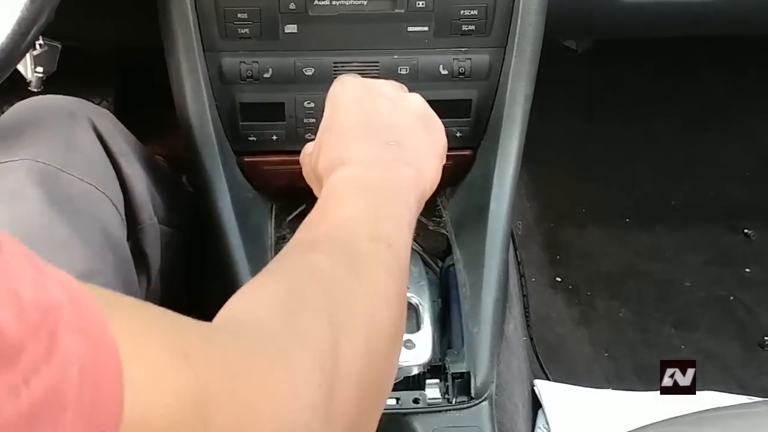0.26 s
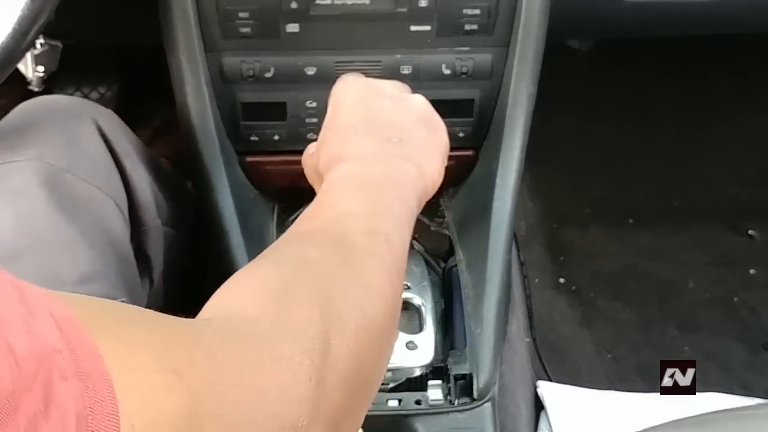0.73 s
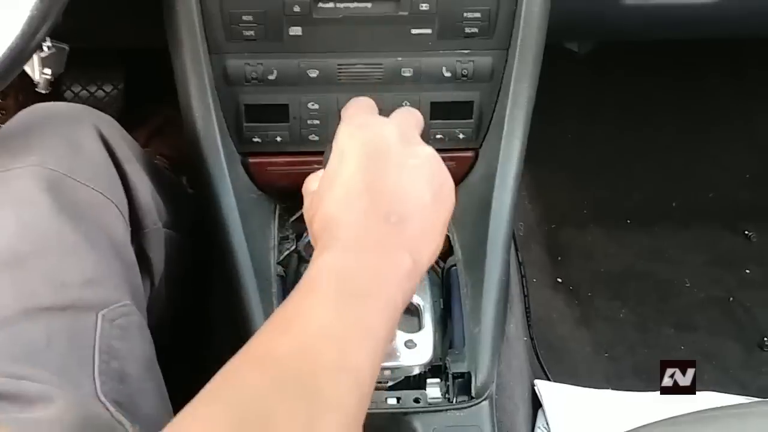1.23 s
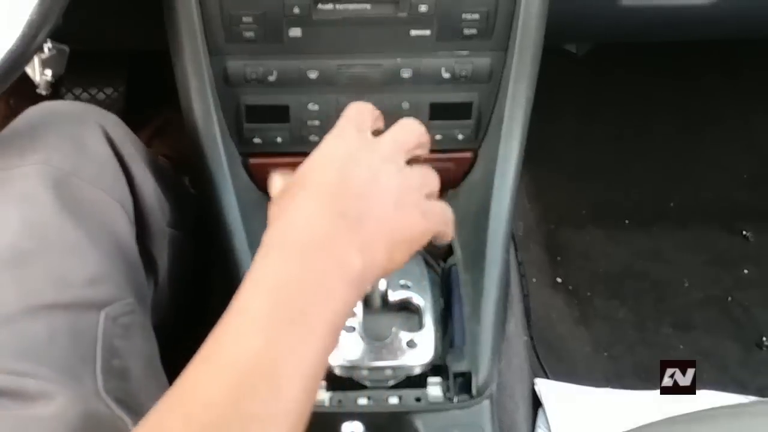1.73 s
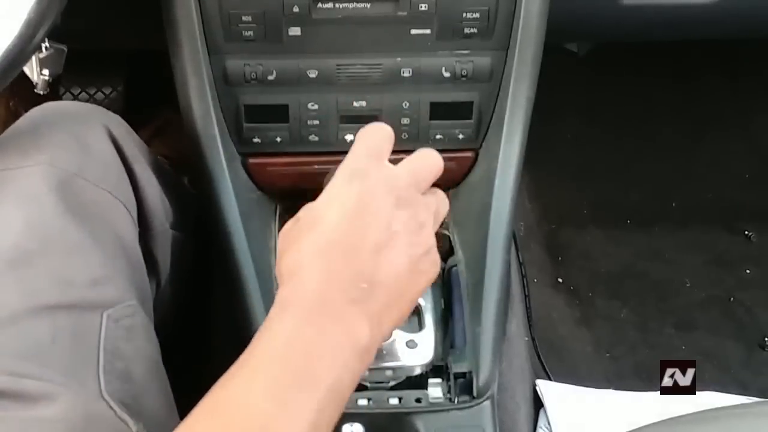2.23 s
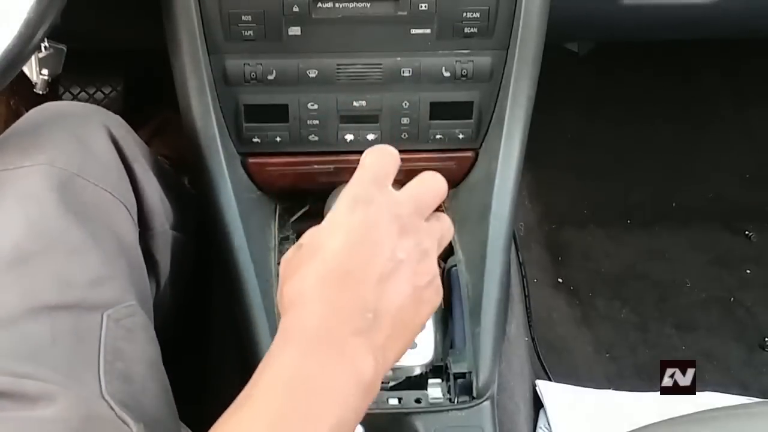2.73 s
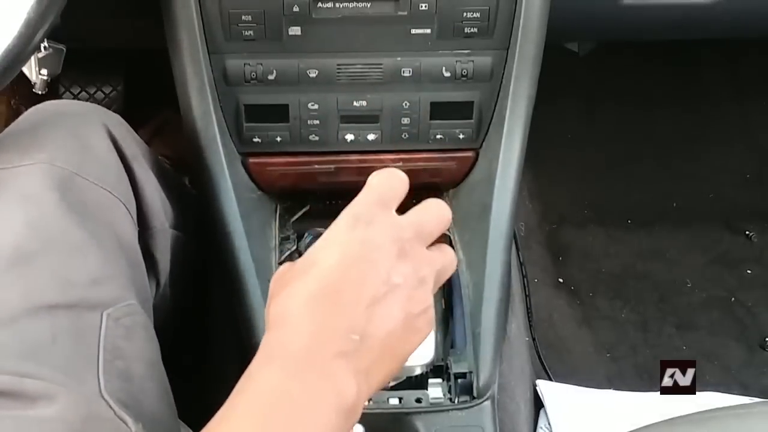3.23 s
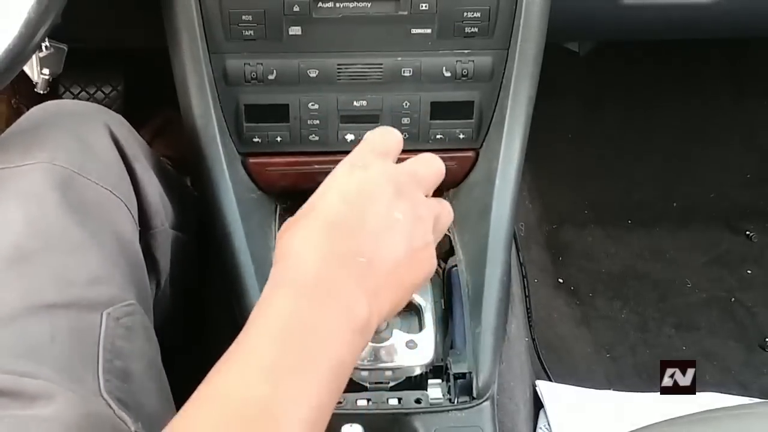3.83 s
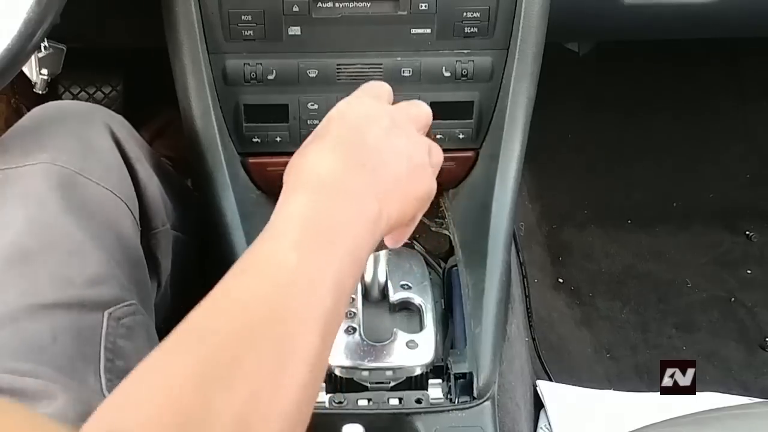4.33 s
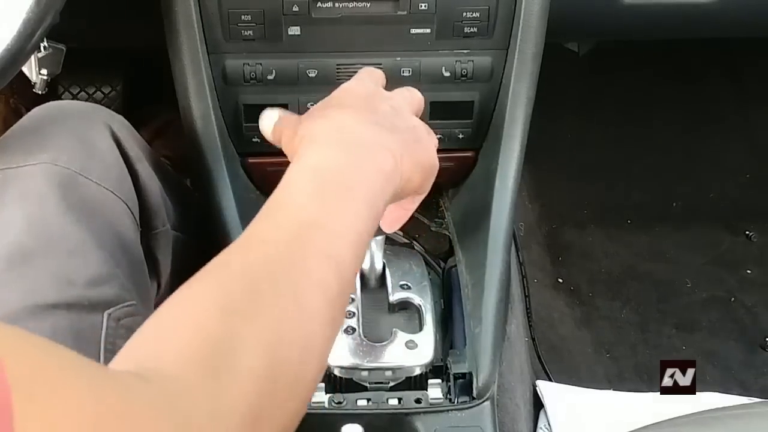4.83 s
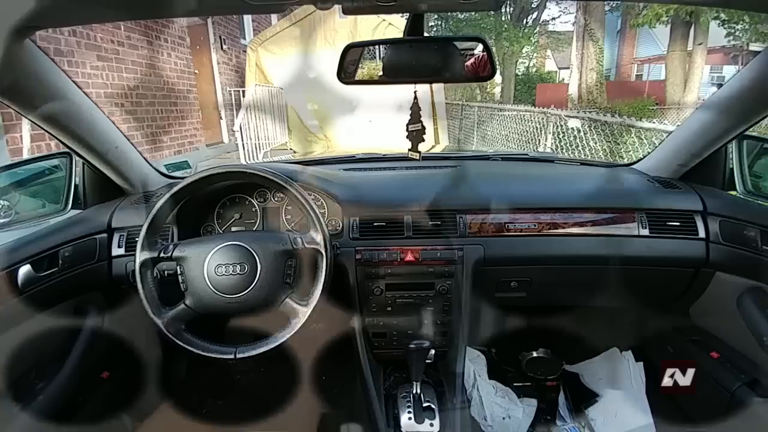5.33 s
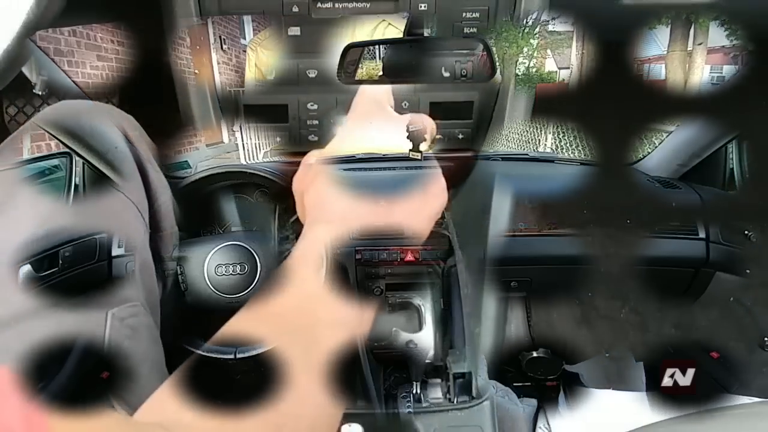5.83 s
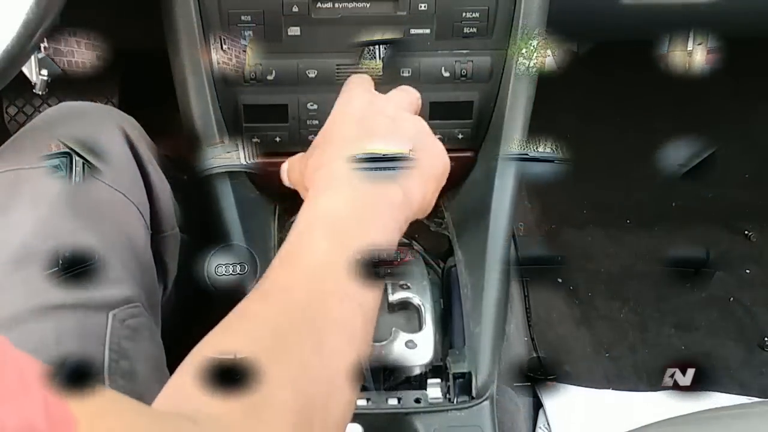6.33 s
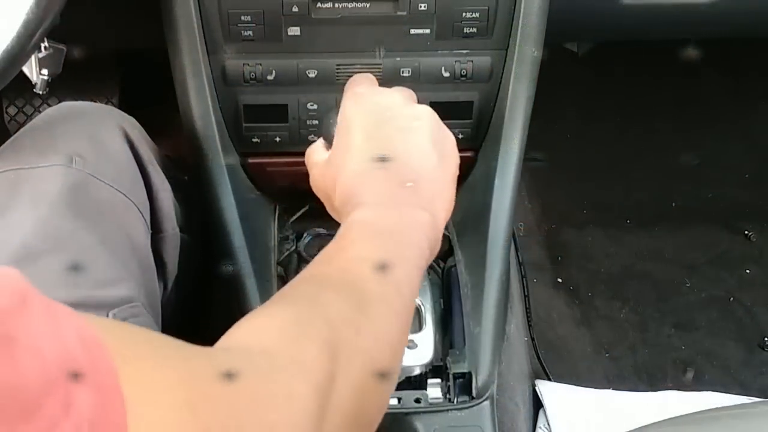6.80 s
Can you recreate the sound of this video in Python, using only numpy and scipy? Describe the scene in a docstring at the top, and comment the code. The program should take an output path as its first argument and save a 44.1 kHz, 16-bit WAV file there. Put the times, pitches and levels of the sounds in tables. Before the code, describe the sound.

Close clicks and padded clunks of a gear selector pulled back notch by notch and pushed forward, then a fading low hum with plastic ticks.

```python
"""Gear lever in a small car cabin

An automatic gear lever is pulled back through its gate and pushed forward again, heard close up.
Detents, plastic ticks and padded knocks are shaped noise bursts; the floor and catch are damped sines.
A palm rubs in shaped noise and a falling whistle squeaks once, over a low rumble and a faint hiss.
Near the end a throbbing hum, like that of a distant motor, is built from three sines and a soft roar.
"""
import sys
import numpy as np
from scipy import signal
from scipy.fft import rfft, irfft, next_fast_len
from scipy.io import wavfile
from scipy.ndimage import uniform_filter1d

SR = 44100
rng = np.random.default_rng(int(sys.argv[2]) if len(sys.argv) > 2 else 0)


def unload_wav(signal):
    """Save mono or channel-first audio to the path in sys.argv[1] as 16-bit WAV at rate SR, clipped to [-1, 1]."""
    wavfile.write(
        sys.argv[1],
        SR,
        np.round(np.clip(np.atleast_2d(signal).T, -1, 1) * 32767).astype(np.int16),
    )


N = 311346
TIME = np.arange(N) / SR  # the whole scene, s
T = np.arange(SR // 2) / SR  # one ringing sound, s
HZ = np.fft.rfftfreq(8192, 1 / SR)  # frequency grid of the impact filters


def amp(db):
    """Turns dB into a linear gain."""
    return 10 ** (np.asarray(db) / 20)


def unit(x):
    """Scales to rms 1."""
    return x / np.sqrt(np.mean(x ** 2) + 1e-20)


def read(points, hz):
    """Joins (f, value) points on a log-frequency axis."""
    f, value = np.transpose(points)
    return np.interp(np.log(hz + 1), np.log(f + 1), value)


def curves(rows):
    """Joins (t, value) points by straight lines."""
    return np.interp(TIME, *np.transpose(rows))


def swell(s, half_length):
    """A bell-shaped gain that peaks at time s."""
    return np.exp(-((TIME - s) / half_length) ** 2)


def wander(rate):
    """A random curve of rms 1 through `rate` new points per second."""
    points = rng.standard_normal(16384)
    return unit(np.interp(TIME * rate, np.arange(16384), points))


def noise(colour):
    """Two unrelated steady noises of one colour, scaled together to rms 1."""
    size = next_fast_len(N)
    gain = amp(read(colour, np.fft.rfftfreq(size, 1 / SR)))
    spectrum = rfft(rng.standard_normal((2, size))) * gain
    return unit(irfft(spectrum, size)[:, :N])


def add(mix, s, sound):
    """Lays a sound into the mix at time s."""
    part = mix[:, max(round(s * SR), 0):][:, :sound.shape[1]]
    part += sound[:, :part.shape[1]]


def blow(sound, db):
    """Gives each channel the energy of a hundredth of a second at this level."""
    energy = (sound ** 2).sum(1, keepdims=True)
    return amp(db) * sound / np.sqrt(energy * 100 / SR + 1e-20)


def peaks(modes, pitch=1):
    """Gain of a set of resonances, their powers summed."""
    power = 0
    for f, width, db in modes:
        off_tune = (HZ ** 2 - (f * pitch) ** 2) / (width * HZ + 1)
        power = power + amp(db) ** 2 / (1 + off_tune ** 2)
    return np.sqrt(power)


def impact(gain, rise, t60, direct=0, spiky=0.29):
    """A contact and its crowd of reflections off the near cabin walls, through a causal filter."""
    rise, t = max(rise, 1e-4), T[:2 * (len(HZ) - 1)]
    signs = rng.choice([-1., 1.], (2, len(t)))
    arrivals = signs * np.exp(spiky * rng.standard_normal((2, len(t))))
    arrivals *= np.minimum(t / rise, 1) * amp(-60 * np.maximum(t - rise, 0) / t60)
    arrivals[:, int(rise * SR)] += direct * np.linalg.norm(arrivals[0])
    # flatten the broad colour of the arrivals, so that the struck part sets the timbre
    smooth_power = uniform_filter1d(abs(rfft(arrivals)) ** 2, size=55, axis=1)
    gain = gain / np.sqrt(smooth_power)
    # minimum phase: the filter speaks at once, with no ringing before the contact
    log_gain = np.log(np.maximum(gain / gain.max(), 1e-5))
    circle = np.hstack([log_gain, log_gain[:, -2:0:-1]])
    minimum_phase = np.exp(np.conj(signal.hilbert(circle)))
    taps = np.fft.ifft(minimum_phase).real[:, :len(HZ) // 2]
    return signal.fftconvolve(arrivals, taps, axes=1)


def ringing(modes, rise, db, detune=0.036):
    """Damped modes that swell over the rise time, each slightly detuned by chance."""
    ring = 0
    for hz, level, t60 in modes:
        mode_hz = hz * (1 + detune * rng.uniform(-1.21, 1))
        phase = 2 * np.pi * (mode_hz * T + rng.random((2, 1)))
        ring = ring + amp(level - 60 * T / t60) * np.sin(phase)
    return blow(ring * (1 - np.exp(-(T / rise) ** 2)), db)


# colour of the low cabin rumble: (f/Hz, relative level/dB)
RUMBLE_COLOUR = [(20, -36), (30, -20), (42, 3), (58, 4.5), (80, -7), (107, -11.5), (200, -15.5), (297, -22),
                 (400, -26.5), (700, -29.5), (1200, -41), (2500, -40), (5000, -99)]
# colour of the faint hiss: (f/Hz, relative level/dB)
HISS_COLOUR = [(300, 12), (1000, 7.5), (2000, -0.5), (3500, 2.5), (5300, 1.5), (7000, 0.5), (8800, 6.5),
               (9600, -1), (10400, -10), (13000, -3), (15500, -5.5)]
# the lever and arm stir the console between blows: (t/s, rumble level/dB before the lift below)
STIR_LEVELS = [(0.0, -50.5), (0.37, -53.5), (1.02, -46), (2.04, -54), (2.37, -50), (2.55, -55),
               (4.95, -54.5), (5.28, -50), (7.05, -50)]


def ambience(hiss_db=-69.0, rumble_lift_db=2.5):
    """Low coloured noise that follows the stirring of the console, and a faint, even hiss."""
    rumble = noise(RUMBLE_COLOUR) * amp(curves(STIR_LEVELS) + rumble_lift_db)
    return rumble + noise(HISS_COLOUR) * amp(hiss_db)


GRIP_DB = -69  # the palm resting on the knob
# colour of skin on the knob: (f/Hz, relative level/dB)
RUB_COLOUR = [(300, 8), (900, -1.5), (1400, 3), (1900, 1), (2600, -3.5), (4000, -6.5), (6500, -12.5),
              (9000, -9), (11000, -19.5)]
# the palm slides in short strokes: (peak t/s, half length/s, level/dB)
PALM_STROKES = [(1.198, 0.065, -57), (1.464, .01, -58), (1.599, 0.07, -59.5), (5.12, 0.031, -55),
                (5.181, 0.013, -56.5), (5.906, 0.016, -54.5), (6.785, 0.039, -58)]


def palm(grain_db=1.5):
    """Skin drags unevenly on the knob: noise with a jittering level."""
    level = amp(GRIP_DB) + sum(amp(db) * swell(s, half) for s, half, db in PALM_STROKES)
    return noise(RUB_COLOUR) * level * amp(grain_db * wander(rate=61))


# colour of dry plastic: (f/Hz, relative level/dB)
PLASTIC_COLOUR = [(250, -22), (800, 0), (1300, 1), (2200, -2.5), (3400, -3.5), (5000, -6.5), (7000, -8),
                  (9000, -1), (9700, -9.5), (10600, -24.5), (12500, -14.5), (15500, -23)]
# resonances that all plastic parts share with the gate plate: (f/Hz, width/Hz, relative level/dB)
PLATE_MODES = [(2760, 44, -3.5), (3030, 57, -14), (3324, 47, -2), (3970, 110, -7)]


def plastic(db, rise, tilt_db, hz, resonance_db=7, width=0.14, plate_db=7, t60=0.083):
    """A dry tick that rings one plastic part, at two pitches, and the gate plate."""
    tilt = tilt_db * np.log2(np.maximum(HZ, 700))  # dB per octave above 700 Hz
    part = [(hz, hz * width, resonance_db), (hz * 1.333, hz * width, resonance_db - 8.5)]
    colour = amp(read(PLASTIC_COLOUR, HZ) + tilt)
    colour *= np.hypot(1, peaks(part))
    colour *= np.hypot(1, amp(plate_db) * peaks(PLATE_MODES))
    return blow(impact(colour, rise, t60, direct=0.15, spiky=0.96), db)


# resonances of the console: (f/Hz, width/Hz, relative level/dB)
CONSOLE_MODES = [(167, 66, 5.5), (242.5, 95, 4.5), (319, 59, 1), (459.5, 40, 0), (515, 25, -0.5),
                 (628, 39, -1), (787, 74, 2.5), (958, 130, -2), (1130, 86, -21), (1360, 200, -65)]


def console(db, contact_hz, rise, t60, damping=0.8, direct=0.23):
    """The console rings up to the pitch of the contact; a softer contact leaves the upper modes still."""
    r = HZ / contact_hz
    contact = 1 / np.hypot(1 - r ** 2, damping * r) / np.hypot(1, (0.21 / (r + 1e-6)) ** 2)
    padding = 1 / np.hypot(1, (HZ / 1350) ** 6)  # dulls the treble
    return blow(impact(peaks(CONSOLE_MODES) * contact * padding, rise, t60, direct), db)


def knock(db, contact_hz):
    """A padded blow on the console; the higher the contact pitch, the drier the knock."""
    t60 = 0.098 * (500 / contact_hz) ** .32
    return console(db, contact_hz, rise=0.00195, t60=t60, damping=1.0)


# low modes of the floor pan and cabin air: (f/Hz before detuning, relative level/dB, t60/s)
FLOOR_MODES = [(48.7, -13.5, 0.35), (66.6, -3.5, 0.17), (88.5, -4, 0.15), (124.2, -6.5, 0.1),
               (153, -0.5, 0.11), (191.3, -1, 0.087)]


def thump(db, rise=0.01):
    """The floor pan takes up the push and booms in its low modes."""
    return ringing(FLOOR_MODES, rise, db)


# the lock button and knob tick:
# (t/s, level/dB, rise/s, brightness/dB per octave, part resonance f/Hz, console level/dB)
PLASTIC_TICKS = [(.05, -44.5, .016, 1, 990, -47.5), (.096, -45, 0.0046, 0.5, 1010, -44),
                 (0.151, -38, 0.012, -0.5, 8240, -36), (.582, -46.5, 0.0024, 2, 8400, -45.5),
                 (.706, -51, 0.0022, -0.5, 3250, -52.5), (0.87, -47, 0.0037, 6.5, 10300, -56),
                 (.905, -42, 0.00089, -2.1, 1900, -46), (1.533, -47.5, 0.011, 2.5, 1170, -43),
                 (1.555, -50, 0.0037, -1.5, 9100, -47), (1.96, -51, 0.013, 13, 6200, -55),
                 (4.796, -34.5, 0.011, 3, 5900, -45.5), (5.097, -53, 0.0024, 0.5, 8500, -60),
                 (5.447, -51.5, 0.0027, 0, 8200, -71), (5.613, -41, 0.0051, 0, 3130, -51),
                 (5.693, -48, 0.0098, -1.5, 1370, -45.5), (5.7703, -30, 0.0023, 1, 8550, -37),
                 (6.053, -32, 0.0066, 2.5, 5600, -48), (6.066, -32.5, 0.0011, -2.7, 3420, -37),
                 (6.713, -45.5, 0.013, .5, 810, -48), (6.842, -46.5, 0.0033, 6.5, 5260, -49.5)]


def ticks(lead_db=-17, lead_s=.008, lag_s=0.00392, thump_db=3):
    """A faint lead-in noise comes just before each tick, which also shakes the console and floor."""
    out = np.zeros((2, N))
    for s, db, rise, tilt_db, hz, console_db in PLASTIC_TICKS:
        add(out, s - lead_s, plastic(db + lead_db, 0.0054, tilt_db, hz, t60=0.055))
        add(out, s, plastic(db, rise, tilt_db, hz))
        add(out, s + lag_s, knock(console_db, contact_hz=870))
        add(out, s + lag_s, thump(console_db + thump_db))
    return out


# dull knocks of the hand on the lever and of the lever on its stops:
# (t/s, console level/dB, contact f/Hz, thump level/dB)
DULL_KNOCKS = [(.175, -32, 424, -31), (0.344, -51.5, 400, -48.5), (.577, -30.5, 268, -31.5),
               (.596, -31, 165, -35.5), (.67, -41, 342, -50), (.693, -36, 307, -42),
               (0.791, -43.5, 280, -37), (.83, -39, 322, -37.5), (1.142, -29.5, 400, -35),
               (1.18, -36, 566, -30), (1.567, -58, 200, -35.5), (1.705, -37, 378, -44.5),
               (2.598, -52.5, 500, -51), (2.975, -53, 764, -53), (3.226, -47, 200, -30.5),
               (3.249, -34, 350, -32), (4.439, -41, 520, -39.5), (4.821, -44.5, 910, -38.5),
               (5.075, -32.5, 514, -38.5), (5.111, -36.5, 315, -48), (5.13, -39.5, 346, -31.5),
               (5.215, -39.5, 169, -30.5), (5.235, -31.5, 200, -31), (5.333, -32, 1100, -31.5)]


def knocks():
    """Padded blows reach only the console and the floor."""
    out = np.zeros((2, N))
    for s, console_db, contact_hz, thump_db in DULL_KNOCKS:
        add(out, s, knock(console_db, contact_hz))
        add(out, s, thump(thump_db, rise=0.018))
    return out


# the grip shifts now and then and nudges the lever; the spread goes either way
NUDGES_PER_S, NUDGE_DB, NUDGE_SPREAD_DB, NUDGE_HZ = 1.2, -54.5, 1, 480


def nudges(count=40):
    """Faint padded knocks at chance moments."""
    out, s = np.zeros((2, N)), 0
    for wait, size in rng.random((count, 2)):
        s = s + 2 * wait / NUDGES_PER_S
        if s < N / SR:
            db = NUDGE_DB + NUDGE_SPREAD_DB * (2 * size - 1)
            add(out, s, knock(db, NUDGE_HZ))
    return out


CATCH_S = 1.1318  # the lever clears the parking catch
CATCH_RING_DB, CATCH_SNAP_DB, CATCH_CONSOLE_DB, CATCH_THUMP_DB = -23.5, -34, -33, -29
# the base of the lever rings: (f/Hz before slight detuning, relative level/dB, t60/s)
LEVER_BASE_MODES = [(327, -13, 0.095), (597, -12.5, 0.057), (738, -2, 0.063), (1375, -20, 0.087),
                    (3560, -10, .02)]


def catch():
    """A snap and a hollow clunk of damped modes as the lever leaves the parking position."""
    out = np.zeros((2, N))
    snap = plastic(CATCH_SNAP_DB, rise=.0035, tilt_db=-2.0, hz=4040, resonance_db=8, t60=0.17)
    add(out, CATCH_S, ringing(LEVER_BASE_MODES, rise=0.0011, db=CATCH_RING_DB, detune=.005))
    add(out, CATCH_S, snap)
    add(out, CATCH_S, knock(CATCH_CONSOLE_DB, contact_hz=740))
    add(out, CATCH_S, thump(CATCH_THUMP_DB))
    return out


# resonances of the detent spring: (f/Hz before the pitch factor, width/Hz, relative level/dB)
SPRING_MODES = [(1666, 35, 5.5), (2430, 100, 4), (2950, 120, -16), (3370, 130, -13), (3160, 100, 14.5),
                (3770, 130, 10), (3680, 114, 17), (4130, 160, 13.5), (4100, 130, -2), (6200, 160, -28),
                (7520, 150, 8), (8560, 120, -15), (9100, 130, 8), (8600, 170, 2), (10000, 120, -31)]
# colour of the crack: (f/Hz, relative level/dB)
CRACK_COLOUR = [(300, 4.5), (800, -2.5), (1300, -2), (1900, -5), (3400, -3), (5000, -5.5), (6600, -5),
                (8700, 1.5), (9500, -8.5), (10500, -19), (12500, -18), (15500, -49)]
# the lever drops into a notch: (t/s, spring ring level/dB, ring pitch factor, crack level/dB,
# console level/dB, contact f/Hz, thump level/dB, first rebound delay/s, rebound level/dB)
NOTCHES = [(2.2610, -28.5, 1, -28.5, -26.5, 530, -27, 0.017, -54),
           (2.695, -30, 1.0, -31, -29.5, 516, -27.5, 0.012, -54),
           (3.208, -37.5, 0.98, -33, -28.5, 573, -29, 0.014, -52),
           (3.7991, -29.5, 0.92, -34, -28.5, 605, -25, .026, -43.5),
           (4.0438, -30, 0.94, -35, -32, 723, -26, 0.023, -38.5),
           (4.155, -35.5, 0.95, -38.5, -29, 620, -25.5, 0.031, -57),
           (4.471, -27, 0.88, -31, -31, 770, -25.5, 0.031, -34.5)]


def detents():
    """The spring snaps and rings at once; the console and floor answer a moment later."""
    out = np.zeros((2, N))
    crack = amp(read(CRACK_COLOUR, HZ))
    for s, ring_db, pitch, crack_db, console_db, contact_hz, thump_db, *_ in NOTCHES:
        spring = peaks(SPRING_MODES, pitch) / np.hypot(1, (HZ / 9200) ** 12)
        # a faint, soft-edged noise burst leads each crack by 7 ms
        add(out, s - .007, blow(impact(crack, rise=0.01, t60=0.026), crack_db - 17.5))
        add(out, s, blow(impact(spring, rise=0.002, t60=0.055, direct=0.27), ring_db))
        add(out, s, blow(impact(crack, rise=0.0042, t60=0.1, direct=0.084), crack_db))
        add(out, s, console(console_db, contact_hz, rise=0.00734, t60=0.11, direct=0.78))
        add(out, s + 0.0028, thump(thump_db))
    return out


# each rebound follows sooner and weaker than the last
BOUNCE_SHRINK, BOUNCE_LOSS_DB = .68, 7.5


def rebounds(count=2):
    """The lever overshoots each notch and rattles in its play."""
    out = np.zeros((2, N))
    for s, *_, gap, db in NOTCHES:
        for _ in range(count):
            s = s + gap
            add(out, s, plastic(db, rise=.0025, tilt_db=-2.0, hz=3670))
            add(out, s, knock(db + 3.0, contact_hz=646))
            add(out, s, thump(db + 5.5))
            gap, db = gap * BOUNCE_SHRINK, db - BOUNCE_LOSS_DB
    return out


# the linkage squeaks once, faintly
SQUEAK_S, SQUEAK_HALF_S, SQUEAK_DB = 2.8, 0.029, -59.5
SQUEAK_HZ, SQUEAK_FALL_HZ_PER_S = 4400, 3800


def squeak(waver=0.059):
    """A thin falling whistle, roughened by fast random pitch changes."""
    hz = SQUEAK_HZ - SQUEAK_FALL_HZ_PER_S * (TIME - SQUEAK_S)
    rough_hz = hz * (1 + waver * wander(rate=1000))
    tone = np.sin(2 * np.pi * np.cumsum(rough_hz) / SR)
    return np.outer([1, 0], tone * amp(SQUEAK_DB) * swell(SQUEAK_S, SQUEAK_HALF_S))


# the hum swells quickly, holds, then dies away, throbbing and its pitch sagging throughout;
# its roar fades more slowly
HUM_START_S, HUM_ATTACK_S, HUM_HOLD_S = 5.28, .1, 0.44
HUM_DB, HUM_FADE_DB_PER_S = -39.5, 12
HUM_HZ, SAG_HZ_PER_S = 112, 3
THROB_HZ, THROB_DB = 3.05, 3.5
ROAR_DB, ROAR_FADE_DB_PER_S = -44, 5.5
# colour of the roar: (f/Hz, relative level/dB)
ROAR_COLOUR = [(30, -52), (60, -26.5), (90, 5), (130, -8), (200, -8), (290, -16), (450, -27), (700, -33.5),
               (1500, -36), (3000, -48.5)]


def motor(waver=0.00803, flutter_db=3.0, second_db=-19, third_db=-27):
    """A wavering low tone with weak overtones in a soft roar."""
    age = np.maximum(TIME - HUM_START_S, 0)
    attack = np.minimum(age / HUM_ATTACK_S, 1)
    throb_db = THROB_DB * np.cos(2 * np.pi * THROB_HZ * (age - HUM_ATTACK_S))
    throb_db = throb_db + flutter_db * wander(rate=15)
    tone_db = HUM_DB - HUM_FADE_DB_PER_S * np.maximum(age - HUM_HOLD_S, 0) + throb_db
    hz = (HUM_HZ - SAG_HZ_PER_S * age) * (1 + waver * wander(rate=15))
    turn = 2 * np.pi * np.cumsum(hz) / SR
    tone = np.sin(turn) + amp(second_db) * np.sin(2 * turn) + amp(third_db) * np.sin(3 * turn)
    hum = np.outer([1, 0], unit(tone) * amp(tone_db))
    roar = noise(ROAR_COLOUR) * amp(ROAR_DB - ROAR_FADE_DB_PER_S * age)
    return attack * (hum + roar)


# likeness of the two microphone ports in the cabin's diffuse sound: (f/Hz, correlation)
PORT_LIKENESS = [(60, 0.93), (130, 0.87), (290, 0.85), (500, 0.5), (750, 0.26), (1300, -0.28), (2300, 0.21),
                 (4000, -0.021), (15000, -0.048)]


def ports(pair):
    """Two microphone ports share the bass but hear the treble differently; both shed the deepest rumble."""
    size = next_fast_len(N + SR // 2)
    hz = np.fft.rfftfreq(size, 1 / SR)
    a, b = rfft(pair, size)
    same = np.clip(read(PORT_LIKENESS, hz), -1, 1)
    second = same * a + np.sqrt(1 - same ** 2) * b
    both = irfft(np.array([a, second]), size)[:, :N]
    return signal.sosfilt(signal.butter(5, 38, "highpass", fs=SR, output="sos"), both)


def scene():
    """Sums every layer and hears it through the two ports."""
    background = ambience() + palm()
    handling = ticks() + knocks() + nudges()
    lever = catch() + detents() + rebounds() + squeak()
    return ports(background + handling + lever + motor())


CUTOFF_HZ = 15800


def record(dry):
    """Limits the band with a steep low-pass."""
    taps = signal.firwin(511, CUTOFF_HZ, window=("kaiser", 9), fs=SR)
    return signal.oaconvolve(dry, taps[None], "same")


dry = scene()
out = record(dry)
unload_wav(out)
```